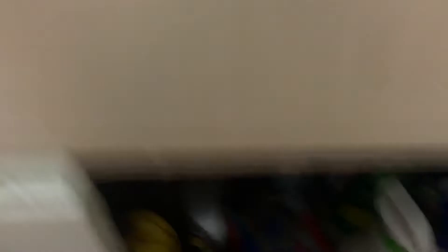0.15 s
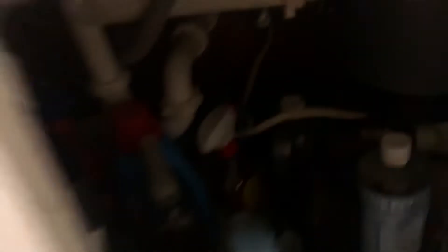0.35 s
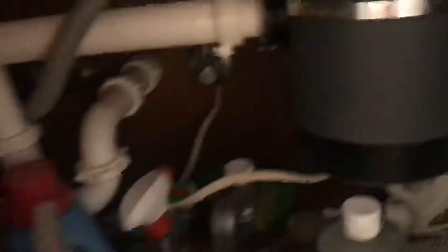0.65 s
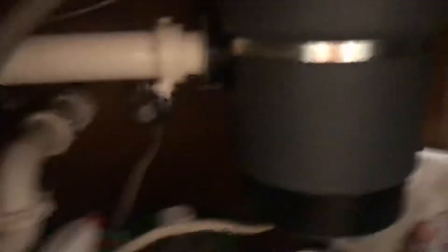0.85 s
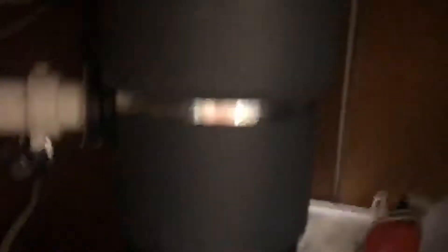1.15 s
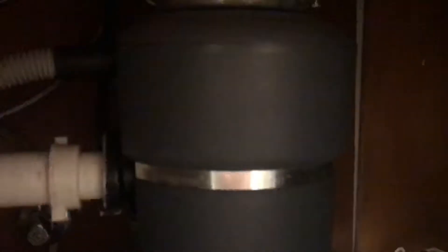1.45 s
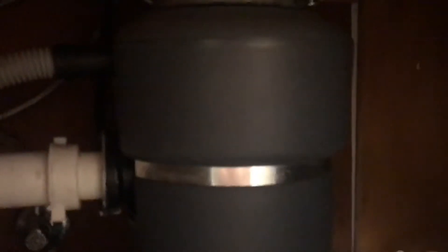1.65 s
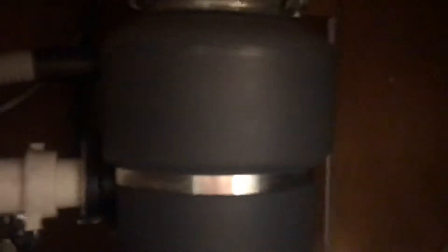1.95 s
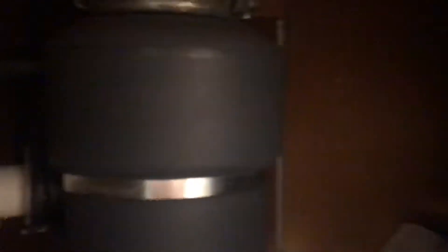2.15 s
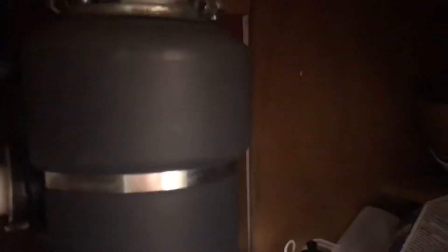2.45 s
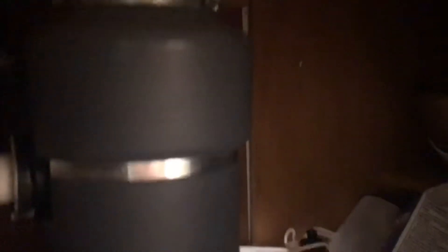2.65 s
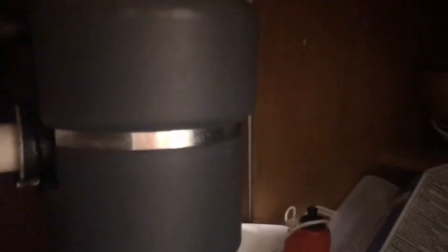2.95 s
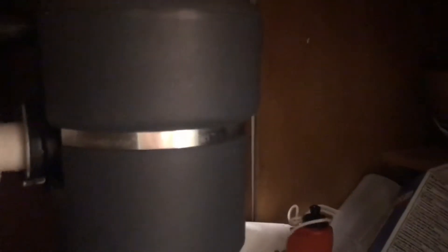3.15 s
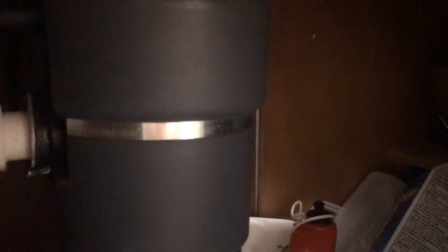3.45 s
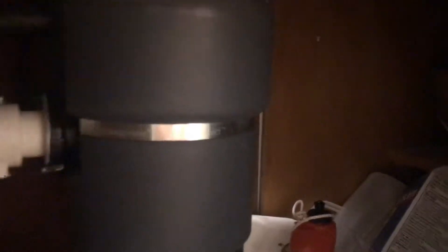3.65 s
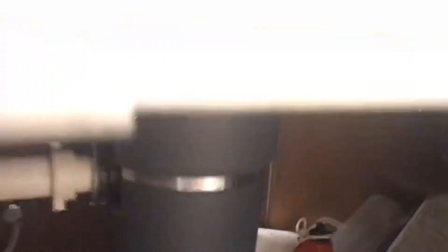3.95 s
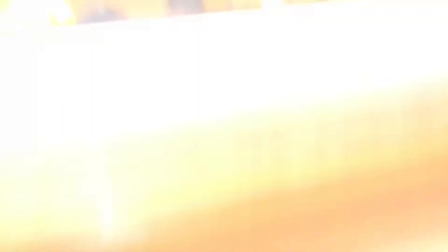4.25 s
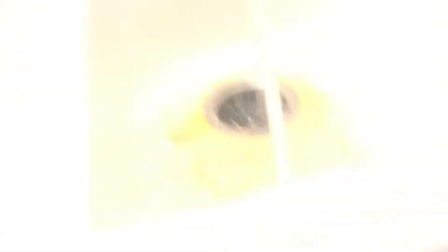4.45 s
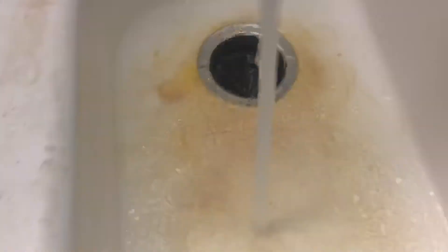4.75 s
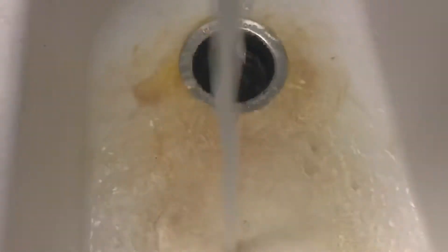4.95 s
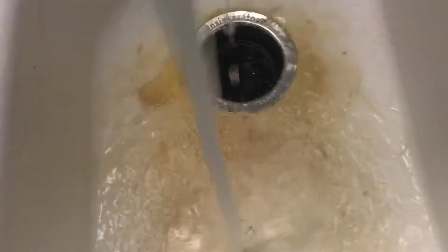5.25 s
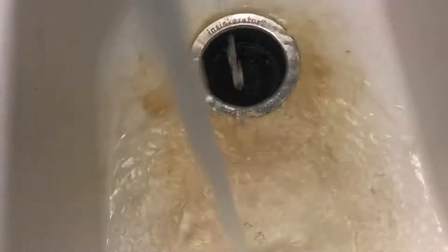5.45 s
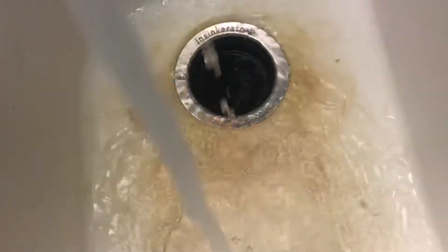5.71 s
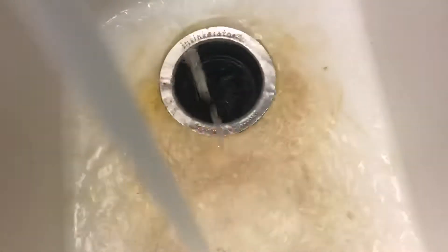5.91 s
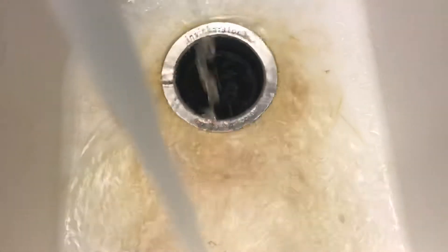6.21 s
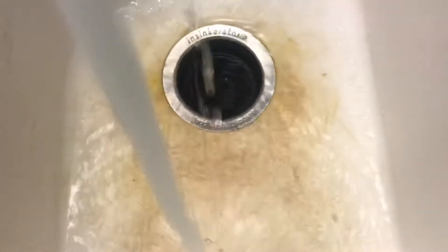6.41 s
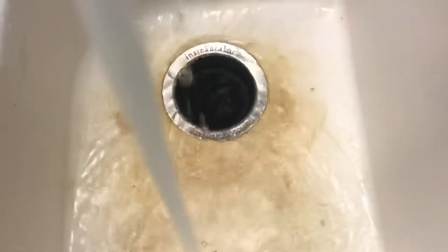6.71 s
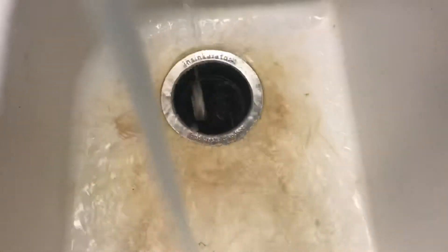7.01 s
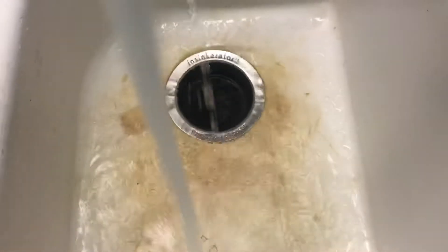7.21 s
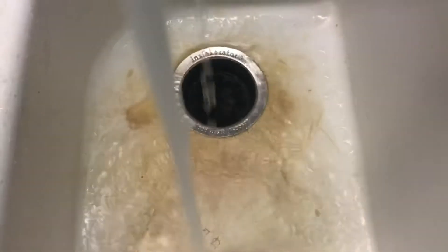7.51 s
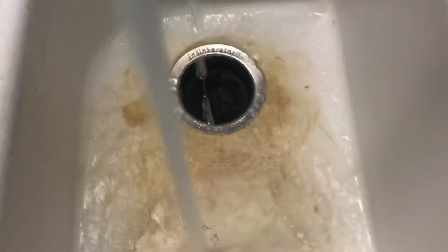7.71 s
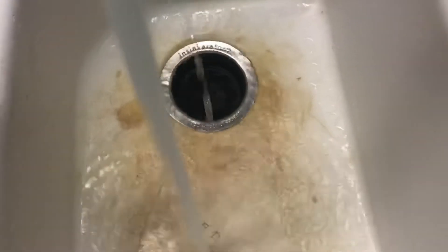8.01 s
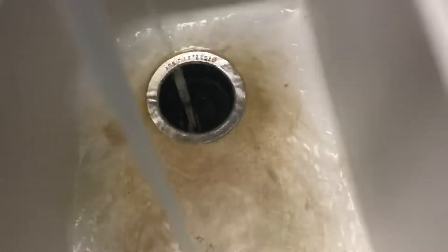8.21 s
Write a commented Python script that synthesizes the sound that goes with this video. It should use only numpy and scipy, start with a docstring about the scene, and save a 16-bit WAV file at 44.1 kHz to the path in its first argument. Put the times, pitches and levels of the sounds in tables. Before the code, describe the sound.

Tap water hisses briefly, then dulls as the microphone goes into the cabinet beside a disposal. A steady low electric hum, whirring plate and wet rattling scraps dominate, with irregular hard knocks. Just after four seconds the microphone comes out above the basin; bright splashing water takes over, with drain gurgle and fading grinding beneath. Small, close room, little reverberation.

```python
"""Tap water hisses half in the open, then a sink disposal takes over as the microphone goes into the cabinet.
The motor hums at twice the mains rate; its plate whirrs in tones of the shaft rate.
Wet scraps rattle as random impacts through the grind chamber's ringing, and pieces knock on its wall.
About 4.3 s in, the microphone is above the sink: the splash, random droplets, is in the open and
combed by basin echoes. Water gurgles in the drain, and the grinding dies down near the end."""
import sys
import numpy as np
from scipy import signal
from scipy.fft import rfft, irfft
from scipy.io import wavfile
from scipy.ndimage import uniform_filter1d, map_coordinates

SR = 44100
rng = np.random.default_rng(int(sys.argv[2]) if len(sys.argv) > 2 else 0)


def dump_mix(stems):
    """Bounce the given channels to the path in sys.argv[1] as a 16-bit WAV at rate SR."""
    frames = np.atleast_2d(stems).T  # one column per channel
    limited = np.clip(frames, -1, 1)  # hard clip at full scale
    pcm = np.round(limited * 32767).astype(np.int16)
    wavfile.write(sys.argv[1], SR, pcm)


N = 369116
TIME = np.arange(N) / SR

# Microphone moves. How far inside the cabinet, next to the motor: start_s, inside (0 outside - 1 closest)
INSIDE = [(.18, 0.065), (.43, 0.64), (.75, 0.85), (2.2, 1), (3.55, 0.92), (3.93, 0.76), (4.3, 0.093)]
# How far it leans toward the drain: start_s, lean (0 at the counter edge - 1 closest)
LEAN = [(4.3, 0), (5.05, .78), (6.05, 1), (7.3, .76), (8.37, .7)]
# How open its path to the basin is: start_s, opening (0 shadowed by the counter - 1 above the sink)
OPENING = [(0, .66), (.18, .4), (.5, .3), (.8, .05), (3.7, .05), (4.1, .48), (4.43, .97), (6.1, 1),
           (8.37, .97)]
# Weaker mains lines that fill the kitchen: mains_multiple, cabinet_level_db, above_sink_level_db
MAINS_LINES = [(1, -54, -48), (6, -48, -47), (10, -52, -58)]
# Tones of the spinning plate: shaft_multiple, level_db (relative to the whirr level)
PLATE_TONES = [(1, -20), (2, -20.5), (8, -21.5), (17, -16.5), (18, -14.5), (28, -12), (32, -14),
               (33, -18.5), (35, -14.5), (37, -12.5), (38, -16), (39, -13.5), (41, -17), (42, -11.5)]
# Ringing of the wet grind chamber, scaled down where used: centre_hz, width_hz, full_height_db
CHAMBER_MODES = [(277.6, 30, 15.5), (551, 26, 6.5), (808, 64, 10.5), (945, 85, 2), (1443, 160, 8.5),
                 (2120, 91, 1.5), (2510, 120, 5), (2850, 290, 11.5)]
# Broad colour of fine scraps: freq_hz, density_db (per Hz, relative)
SCRAPS_COLOUR = [(30, -13), (90, 5.5), (160, 0), (195, -15.5), (240, 0), (420, 0.5), (580, 0), (660, -5.5),
                 (740, -3.5), (1000, 2.5), (1300, -6), (1900, -4.5), (2400, -11.5), (4000, -19),
                 (8000, -29)]
# Broad colour of a hard piece on the chamber wall, before its tilt: freq_hz, density_db (per Hz, relative)
BLOW_COLOUR = [(25, -42), (70, -13), (160, -10), (420, -8), (580, -1), (660, -8.5), (760, 3.5), (1050, 2.5),
               (1300, -4), (1900, -4), (2400, -12), (4000, -14.5), (6000, -18.5), (15000, -37)]
# Large pieces hitting the chamber wall:
# start_s, energy_db, ring_hz (strongest), bass_boost_db, crunch_length_s, tilt_db (per octave)
KNOCKS = [(.889, -1, 729, 23, .007, -2), (1.222, 4, 961, 9, .0045, -1.5), (1.248, 3, 825, 5, 0.0061, -4),
          (1.272, 1, 947, 19, 0.0056, 7), (1.578, 10.5, 1440, 5, 0.015, 1.5),
          (1.622, 12.5, 970, 10, 0.0061, 0), (1.744, 3, 1050, -8, 0.0088, 2.5),
          (1.795, 4, 1050, -15, .0016, -1), (1.817, 7.5, 546, 14, 0.0031, -1.5),
          (1.846, 9.5, 1050, -8, 0.0042, -3.5), (1.876, 9, 829, 11, 0.0095, 2),
          (1.963, 3, 850, -6, 0.0051, -2), (2.104, 2.5, 791, 8, 0.015, 4.5),
          (2.253, 8.5, 470, 13.5, 0.017, 1), (2.556, 6, 945, 6, 0.0036, 0.5),
          (2.961, 4.5, 791, 9, 0.0044, 0), (3.401, 1.5, 850, -3, 0.0024, -6),
          (3.435, 4, 845, 2, 0.0058, 2.5), (3.615, -1, 1100, -3, .0013, -6),
          (3.639, 10, 826, -6, 0.0049, -5), (3.676, 3, 880, -5, .004, -1),
          (3.685, 10.5, 860, 6, 0.0025, -1.5), (5.762, 6.5, 1280, 2, 0.025, 9),
          (6.402, 4.5, 1450, 17, 0.023, 4)]
# Colour of the splash above the sink: freq_hz, density_db (per Hz, relative)
OPEN_SPLASH_COLOUR = [(350, -20), (520, -8), (700, -22), (850, -17.5), (1700, -8.5), (2200, -7.5),
                      (3300, -1), (4400, 0.5), (7000, -1.5), (8600, 0.5), (9900, -1.5), (10500, -5.5),
                      (11300, -1), (15700, -3.5)]
# Colour of the splash through the cabinet: freq_hz, density_db (per Hz, relative)
MUFFLED_SPLASH_COLOUR = [(350, 4.5), (700, -15), (1500, -0.5), (2400, -3.5), (3000, 3), (3700, -1),
                         (4400, 2), (5200, 0), (7200, -0.5), (9800, -5.5), (10400, -11.5), (11600, -9),
                         (15700, -14)]
# Standing waves of the basin around the splash: centre_hz, width_hz, height_db
BASIN_MODES = [(3080, 67, 13), (3073, 125, -11.5), (3400, 270, 2.5), (3670, 83, -7), (3770, 150, 4),
               (4480, 290, 2.5), (4940, 310, -2), (5360, 340, 3.5), (6130, 380, 3.5), (7000, 350, 1.5),
               (7550, 150, 4), (7560, 260, -0.5), (8520, 300, 1)]
# Echo off the basin wall, nearer as the microphone leans in, until it is out of line: start_s, delay_ms, gain
WALL_ECHO = [(4.4, .57, .11), (4.85, .5, .16), (5.3, .4, .16), (5.8, .27, 0)]
# Colour of the water in the drain's throat: freq_hz, density_db (per Hz, relative)
THROAT_COLOUR = [(25, -18), (50, -8), (90, -18), (130, -6), (165, 4), (200, -3), (265, 2.5), (330, -4.5),
                 (385, -34), (450, -11.5), (700, -25), (2000, -73)]
# Low bumps as the microphone is carried: centre_s, peak_level_db, length_s
BUMPS = [(.88, -51, .14), (5.03, -45, 0.31), (5.839, -39, 0.11), (6.43, -45, .12)]
# Colour of those bumps: freq_hz, density_db (per Hz, relative)
RUMBLE_COLOUR = [(20, 0), (42, 2), (70, 2), (150, -25), (600, -60), (4000, -90)]

# Source levels: outside_db, gain_inside_db, gain_over_drain_db
HUM_DB = (-47, 17.5, 11)
WHIRR_DB = (-45, 11, -2)
CHURN_DB = (-46.5, 14.5, 2)
GURGLE_DB = (-42.5, -5, 6)
MUFFLED_SPLASH_DB = (-36, 0.8, 0.5)
SPLASH_DB, COUNTER_SHADOW_DB = -21, 26.5  # tap water heard directly, and what the counter takes off it
MAINS_HZ, SHAFT_HZ = 60, 29.74
FEED_S, FEED_DB_PER_S = 1.05, 0.5  # the churn builds until all the peels have reached the plate
CLEARING_S, CLEARING_DB_PER_S = 5.9, 1.5  # from then on the chamber empties and the churn dies down
# Smaller pieces strike at random while the peels are still coarse
COARSE_FROM_S, COARSE_TO_S, CHIPS_PER_S = 1.2, 3.4, 6
CHIP_DB, CHIP_SPREAD_DB, CHIP_LENGTH_S = -2, 1.6, 0.0041
CHIP_RING_HZ, CHIP_RING_OCTAVES = 940, 0.4  # typical pitch and its spread
CHIP_BASS_DB, CHIP_TILT_DB = 4, 2.5  # tilt is per octave
FLOOR_ECHO_MS, FLOOR_ECHO_GAIN = 0.71, 0.12  # gain at the closest lean
EDGE_HZ = 15750  # top of the recorder's band


def motor(opening):
    """Hum locked to the mains, and the whirr of the plate, whose speed wavers under the load."""
    mains = 2 * np.pi * MAINS_HZ * TIME
    hum = amp(heard(HUM_DB) + 0.81 * wander(4.7)) * np.sin(2 * mains)
    for multiple, shut_db, open_db in MAINS_LINES:
        level = amp(shut_db + (open_db - shut_db) * opening + 0.81 * wander(3.4))
        phase = 2 * np.pi * rng.random()
        hum += level * np.sin(multiple * mains + phase)

    shaft_speed = SHAFT_HZ * (1 + 0.0008 * wander(2))
    shaft = 2 * np.pi * np.cumsum(shaft_speed) / SR
    # the tones run in step, so they add up to a light tapping of uneven strength
    taps = np.zeros(N)
    for multiple, db in PLATE_TONES:
        taps += amp(db + 1.6 * wander(3)) * np.sin(multiple * shaft)
    whirr = amp(heard(WHIRR_DB) - cleared() + 2.0 * wander(30)) * taps
    return np.sqrt(2) * (hum + whirr)  # the root of two turns sine peaks into rms levels


def churn():
    """Clumps of fine scraps rattle as random impacts in the ringing chamber."""
    scraps = patter(per_s=1300, spread_db=2.0)
    scraps = scraps * lug_beat(depth=0.22) * amp(1.36 * wander(25))
    chamber = response(SCRAPS_COLOUR, chamber_peaks(0.66))
    unfed_db = FEED_DB_PER_S * np.maximum(FEED_S - TIME, 0)
    return amp(heard(CHURN_DB) - unfed_db - cleared()) * unit(through(scraps, chamber))


def lug_beat(depth):
    """Two lugs on the plate sweep the slurry past the shredder, so the level beats twice a turn."""
    return 1 + depth * np.cos(2 * np.pi * 2 * SHAFT_HZ * TIME + 0.7 * wander(2.7))


def cleared():
    """Decibels by which the load has fallen as the scraps wash away."""
    return CLEARING_DB_PER_S * np.maximum(TIME - CLEARING_S, 0)


def chamber_peaks(scale):
    """The chamber's resonances with their heights in dB scaled."""
    return [(hz, width, scale * db) for hz, width, db in CHAMBER_MODES]


def knocks():
    """All pieces, large and small, that the plate flings against the wall."""
    out = np.zeros(N)
    for start_s, *piece in KNOCKS + chips():
        sound = knock(*piece)
        part = out[round(start_s * SR):][:len(sound)]
        part += sound[:len(part)]
    return out


def knock(db, ring_hz, bass_db, length_s, tilt_db, size=4096):
    """A piece drags on the wall and crumbles; the chamber rings, most near a pitch set by the spot hit."""
    t = np.arange(size) / SR
    # a quick burst of contacts, then a faint scrape as the crumbs scatter
    burst = np.exp(-t / max(length_s, 0.001))
    scrape = 0.06 * np.exp(-t / 0.014)
    onset = 1 - np.exp(-t / 0.00073)
    contacts = rng.choice([-1, 1], size) * (rng.random(size) < 9000 / SR)
    force = contacts * (burst + scrape) * onset

    # treble tilt about 1 kHz, acting from 700 to 5000 Hz
    colour = [(hz, level + tilt_db * np.log2(np.clip(hz, 700, 5000) / 1000)) for hz, level in BLOW_COLOUR]
    spot = [(ring_hz, 220, 4), (280, 420, bass_db)]
    sound = through(force, response(colour, chamber_peaks(0.89) + spot))
    return amp(db) * sound / np.linalg.norm(sound)


def chips():
    """Random knocks of smaller pieces, one per time slot, as rows like those of the large ones."""
    rows = []
    for slot_s in np.arange(COARSE_FROM_S, COARSE_TO_S, 1 / CHIPS_PER_S):
        start_s = slot_s + rng.random() / CHIPS_PER_S
        db = CHIP_DB + CHIP_SPREAD_DB * rng.standard_normal()
        ring_hz = CHIP_RING_HZ * 2 ** (CHIP_RING_OCTAVES * rng.standard_normal())
        rows.append((start_s, db, ring_hz, CHIP_BASS_DB, CHIP_LENGTH_S, CHIP_TILT_DB))
    return rows


def splash(opening):
    """The stream bursts into countless droplets; the muffled part is dulled by the cabinet and beaten."""
    drops = flicker(patter(per_s=16000, spread_db=2.5), patchy_db=1.93) * amp(1.0 * wander(240))
    spray = flicker(patter(per_s=12000, spread_db=0.0), patchy_db=1.5) * amp(0.61 * wander(50))
    spray = spray * lug_beat(depth=0.12)

    above_db = SPLASH_DB - COUNTER_SHADOW_DB * (1 - opening)
    above = amp(above_db) * unit(through(drops, response(OPEN_SPLASH_COLOUR, BASIN_MODES)))
    below = amp(heard(MUFFLED_SPLASH_DB)) * unit(through(spray, response(MUFFLED_SPLASH_COLOUR)))
    flow = amp(0.3 * wander(8.8))
    return flow * (above + below + opening * basin_echoes(above))


def flicker(x, patchy_db, size=128):
    """Clusters of like-sized droplets brighten one band or another for a few milliseconds."""
    overlap = size - size // 4
    spectrum = signal.stft(x, nperseg=size, noverlap=overlap)[2]
    patches = rng.standard_normal(spectrum.shape)
    patches = uniform_filter1d(patches, size=5, axis=0)  # across frequency
    patches = unit(uniform_filter1d(patches, size=6, axis=1))  # across time
    return signal.istft(spectrum * amp(patchy_db * patches), nperseg=size, noverlap=overlap)[1][:N]


def basin_echoes(x):
    """Echoes off floor and wall comb the hiss; the wall's comb sweeps upward as its delay shrinks."""
    start_s, delay_ms, gain = np.transpose(WALL_ECHO)
    wall = np.interp(TIME, start_s, gain) * delayed(x, np.interp(TIME, start_s, delay_ms))
    floor = FLOOR_ECHO_GAIN * curve(LEAN) * delayed(x, FLOOR_ECHO_MS)
    return wall + floor


def delayed(x, ms):
    """x, later by a steady or changing delay, read between samples."""
    return map_coordinates(x, [np.arange(N) - ms * SR / 1000], order=3)


def drain():
    """Large bubbles slosh in the throat of the drain, as random impacts through a low colour."""
    slosh = patter(per_s=1400, spread_db=2.0) * amp(0.83 * wander(20))
    return amp(heard(GURGLE_DB)) * unit(through(slosh, response(THROAT_COLOUR)))


def bumps():
    """Soft swells of rumble on the microphone."""
    swell = np.zeros(N)
    for centre_s, db, length_s in BUMPS:
        swell += amp(db) * np.exp(-(2 * (TIME - centre_s) / length_s) ** 2)
    rumble = through(rng.standard_normal(N), response(RUMBLE_COLOUR))
    return swell * unit(rumble)


def kitchen(x, t60, wet_db):
    """Dense, quickly dying reflections from cabinet and walls; t60 is the 60 dB decay in seconds."""
    t = np.arange(SR // 2) / SR
    taps = rng.choice([-1, 1], len(t)) * (rng.random(len(t)) < 2000 / SR) * (t > 0.003)
    tail = taps * np.exp(-np.log(1000) * t / t60)
    wet = amp(wet_db) * through(x, tail / np.linalg.norm(tail))
    return (x + wet) / np.hypot(1, amp(wet_db))


def heard(levels):
    """Level in dB of a source as the microphone moves."""
    outside_db, inside_db, drain_db = levels
    return outside_db + inside_db * curve(INSIDE) + drain_db * curve(LEAN)


def patter(per_s, spread_db):
    """Random tiny impacts of either sign; with a spread, most are small and a few large."""
    sizes = amp(spread_db * np.minimum(rng.exponential(1, N), 4))
    return unit(sizes * rng.choice([-1, 1], N) * (rng.random(N) < per_s / SR))


def response(points, peaks=(), size=4096):
    """Causal (minimum-phase) impulse response of energy 1 from a broad spectrum and resonances on it."""
    f = np.fft.rfftfreq(size, 1 / SR)
    hz, db = np.transpose(points)
    db = np.interp(np.log(f + 1), np.log(hz), db)
    for centre, width, height in peaks:
        db = db + height / (1 + (2 * (f - centre) / width) ** 2)
    log_gain = np.log(amp(db) * (f + 1) / (f + 20))  # the ratio thins the lowest bass
    circle = np.concatenate([log_gain, log_gain[-2:0:-1]])
    ring = np.fft.ifft(np.exp(np.conj(signal.hilbert(circle)))).real
    return ring / np.linalg.norm(ring)


def through(x, ring):
    """Plays x through an impulse response."""
    return signal.oaconvolve(x, ring)[:len(x)]


def wander(hz):
    """Random drift of rms 1, its spectrum falling away above about hz."""
    f = np.fft.rfftfreq(N, 1 / SR)
    return unit(irfft(rfft(rng.standard_normal(N)) / (1 + (f / hz) ** 2), N))


def curve(rows):
    """Joins (s, value) rows by straight lines."""
    return np.interp(TIME, *np.transpose(rows))


def unit(x):
    """Scales to rms 1."""
    return x / np.sqrt(np.mean(x ** 2) + 1e-20)


def amp(db):
    """Decibels to gain."""
    return 10 ** (np.asarray(db) / 20)


def scene():
    """All sources at one microphone, the same in both channels."""
    opening = np.clip(curve(OPENING), 0, 1)
    water = kitchen(splash(opening), t60=0.066, wet_db=-10.0)
    grinding = kitchen(churn() + knocks(), t60=0.11, wet_db=-8)
    mono = motor(opening) + grinding + water + drain() + bumps()
    return np.array([mono, mono])


def record(dry):
    """The recorder's band limit, a steep low-pass."""
    low_pass = signal.firwin(701, EDGE_HZ, window=("kaiser", 9), fs=SR)
    return signal.oaconvolve(dry, low_pass[None], "same")


dry = scene()
out = record(dry)
dump_mix(out)
```